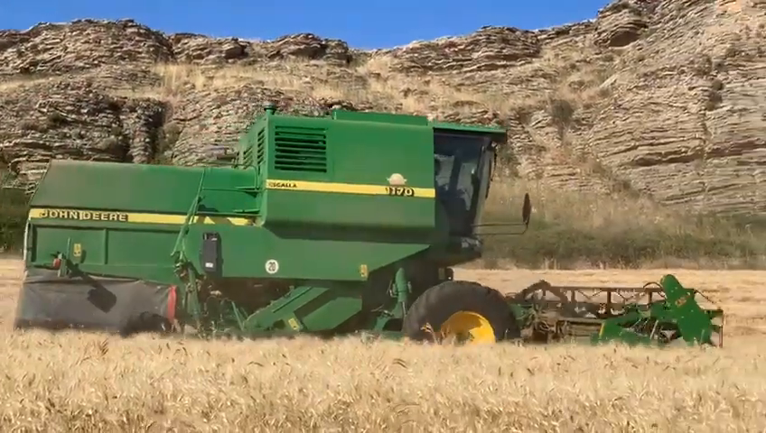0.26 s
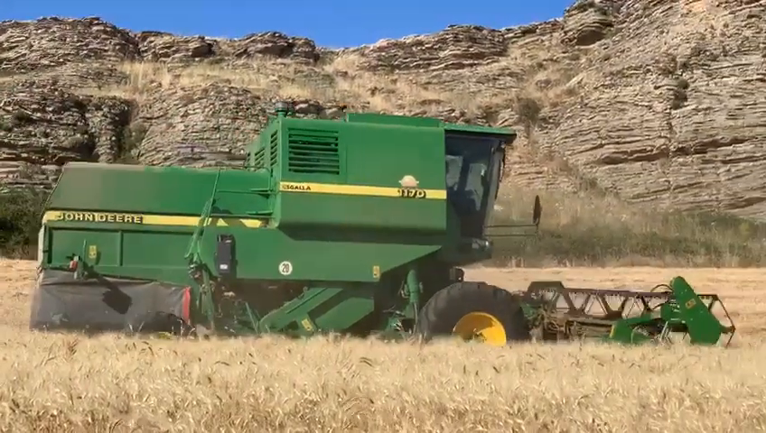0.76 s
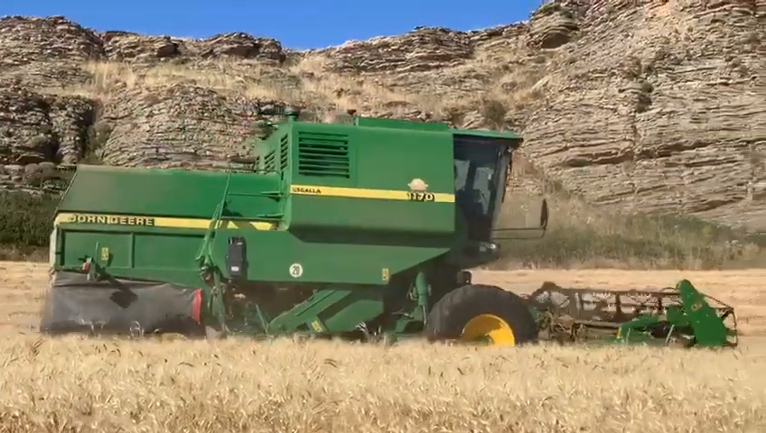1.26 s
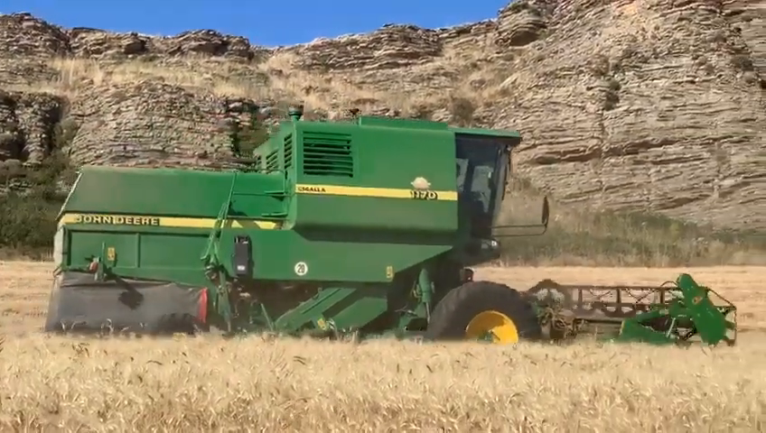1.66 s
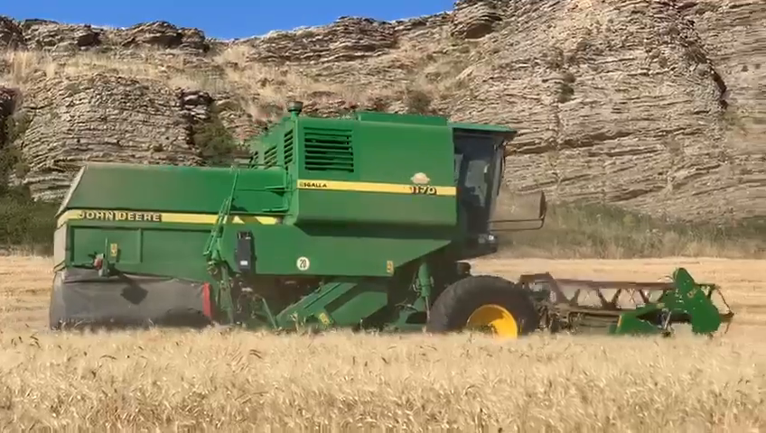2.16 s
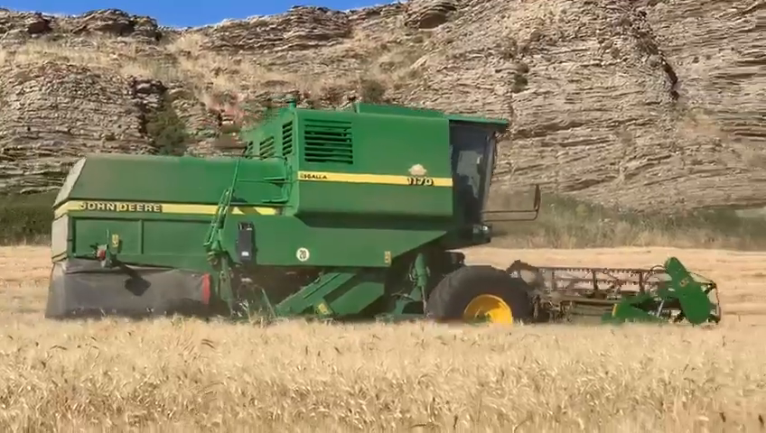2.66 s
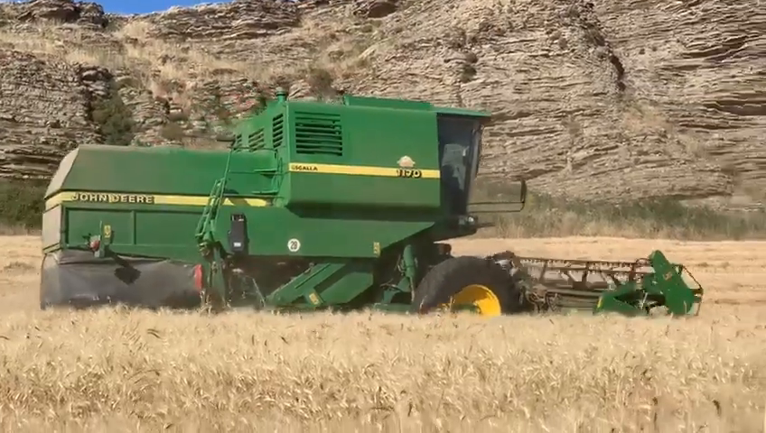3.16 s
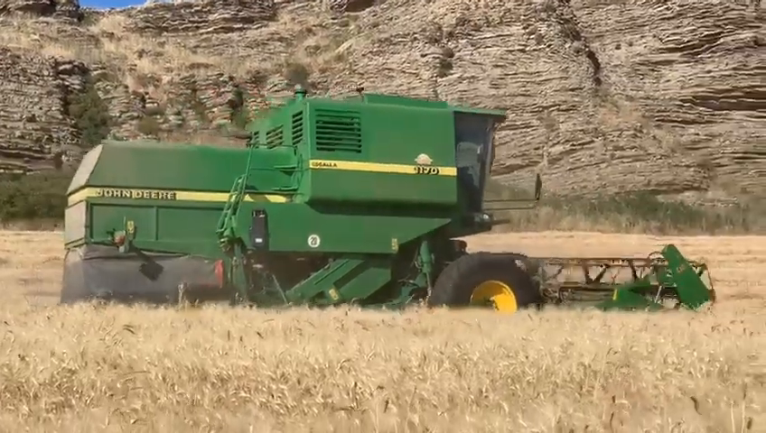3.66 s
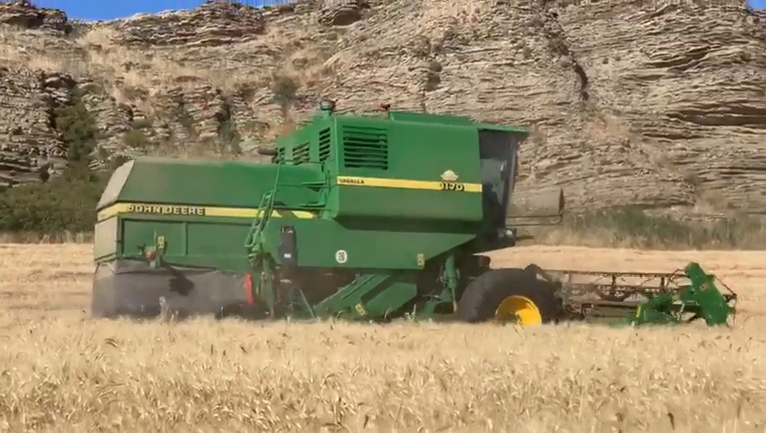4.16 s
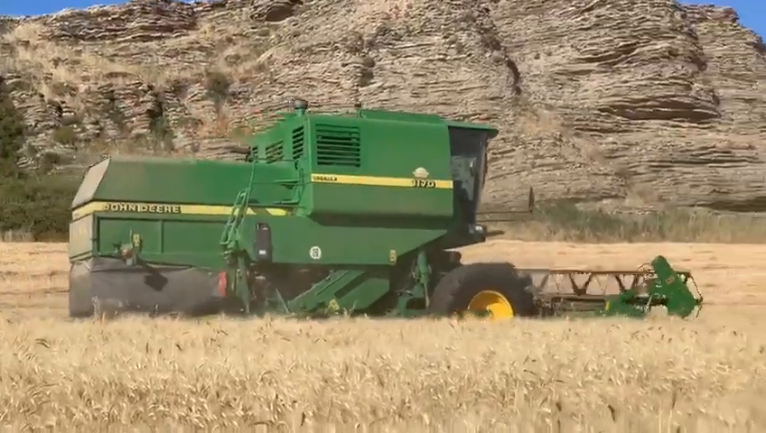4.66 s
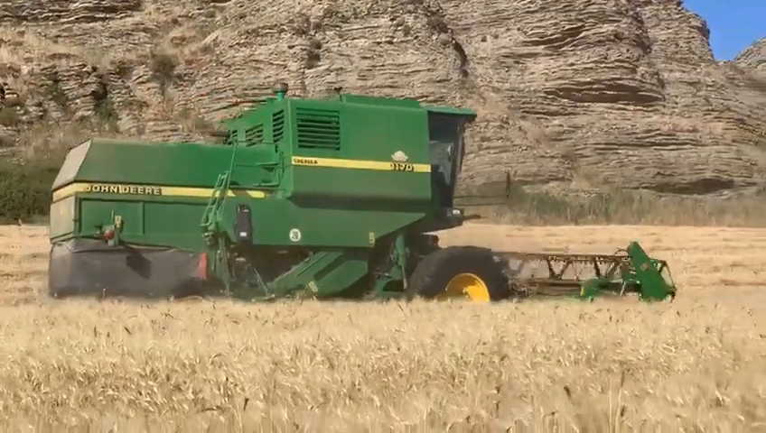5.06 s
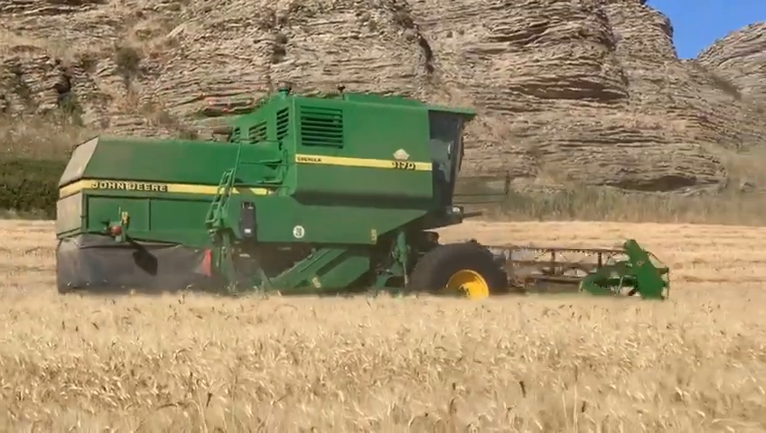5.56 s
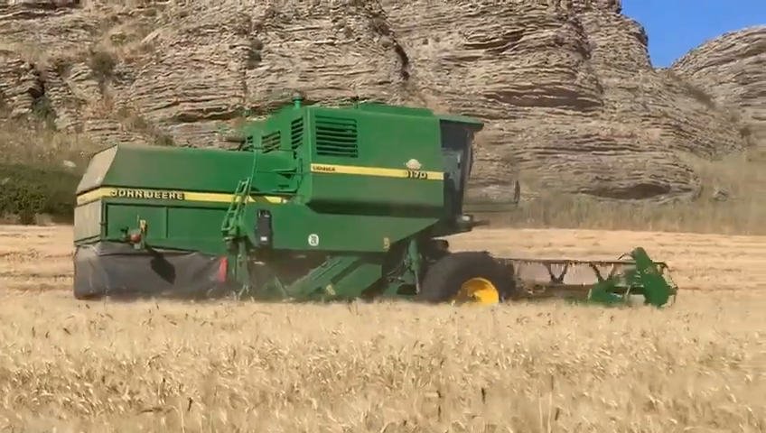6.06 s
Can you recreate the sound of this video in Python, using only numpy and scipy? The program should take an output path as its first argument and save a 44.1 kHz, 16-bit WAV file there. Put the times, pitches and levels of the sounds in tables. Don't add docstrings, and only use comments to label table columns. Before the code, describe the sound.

Low wind buffeting with sharp cracks and thuds half covers a harvester's constant engine and thresher roar, chaff hiss and sparse clacks.

```python
import sys
import numpy as np
from scipy import signal
from scipy.fft import rfft, irfft, next_fast_len
from scipy.io import wavfile
from scipy.ndimage import uniform_filter1d

SR = 44100
rng = np.random.default_rng(int(sys.argv[2]) if len(sys.argv) > 2 else 0)


def attenuation_scalar(level_db):
    decades = np.asarray(level_db, float) / 20
    return 10 ** decades


def put_to_file(sound):
    columns = np.atleast_2d(sound).T
    safe = np.clip(columns, -1, 1)
    whole_steps = np.round(safe * 32767)
    wavfile.write(sys.argv[1], SR, whole_steps.astype(np.int16))


N = 278271

# pitch_hz, lean_db
PORT_LEAN = [(400, -0.64), (650, 2.5), (950, 0.5), (1150, 5.5), (1400, 3), (1700, 5), (2200, 0),
             (2500, -5.5), (5300, -1.5), (6500, 2.74)]


def evened(x):
    return x / np.sqrt(np.mean(x ** 2) + 1e-20)


def read(points, hz):
    f, value = np.transpose(points)
    return np.interp(np.log(hz + 1), np.log(f + 1), value)


def along(rows, count):
    s, *columns = np.transpose(rows)
    times = np.linspace(0, N / SR, count)
    return [np.interp(times, s, column) for column in columns]


def wander(width_hz):
    pole = np.exp(-2 * np.pi * width_hz / SR)
    drift = signal.lfilter([1], np.poly([pole, pole]), rng.standard_normal(N + SR))
    return evened(drift[SR:])


def add(mix, s, sound):
    part = mix[..., round(s * SR):][..., :len(sound)]
    part += sound[:part.shape[-1]]


def swell(start, length, rise, fall):
    t = np.arange(N) / SR - start
    return np.clip(t / rise + 1, 0, 1) ** 2 * np.exp(-np.maximum(t - length, 0) / fall)


def burst(hz, cycles):
    u = np.arange(int(3 * cycles * SR / hz)) * hz / SR
    hump = (u / cycles) * np.exp(1 - u / cycles * 2) * 2
    return np.sin(2 * np.pi * u) * hump


def rush(shape_db, patchy_db, flicker_db):
    frames = N // 128 + 5
    z = rng.standard_normal((frames, 257, 5)).T
    patches = uniform_filter1d(z[4], size=8, axis=0)
    patches = evened(uniform_filter1d(patches, size=20, axis=1))
    flicker = evened(uniform_filter1d(rng.standard_normal(frames), size=12))
    field = attenuation_scalar(shape_db[:, None] + patchy_db * patches + flicker_db * flicker)
    noise = signal.istft((z[:2] + 1j * z[2:4]) * field, nperseg=512, noverlap=384)[1]
    return evened(noise[:, :N])


def middle_slice():
    # start_s, length_s, level_db
    slice_swells = [
        (0.61, 0.051, -48.5),
        (0.907, 0.15, -47),
        (3.285, 0.31, -45.5),
        (3.852, .6, -51),
        (4.9, 0.32, -48),
        (5.497, 0.77, -43.5),
    ]
    floor_db, edge_s = -57.5, 0.057
    band = signal.butter(2, [2500, 3800], "band", fs=SR, output="sos")
    power = attenuation_scalar(2 * floor_db)
    for s, length, db in slice_swells:
        power = power + attenuation_scalar(2 * db) * swell(s, length, edge_s, edge_s)
    return np.sqrt(power) * evened(signal.sosfilt(band, rng.standard_normal(N)))


def straw_hiss():
    # pitch_hz, density_db_per_hz
    straw = [(2000, -9.5), (4400, -10), (5800, 0), (6800, -5), (7700, -1.5), (8100, -0.5), (9000, 0),
             (10500, -5), (11700, -5.5)]
    # start_s, peak_db
    clacks = [(0.395, -31), (0.5222, -23), (0.6414, -21), (0.746, -13.5), (1.7355, -35), (2.1889, -13),
              (2.4738, -19), (2.9178, -13), (3.136, -23), (3.89, -14.5), (4.9881, -14), (5.6565, -22),
              (6.1828, -8)]
    hiss_db = np.linspace(-43.5, -46.5, N)
    hz = np.fft.rfftfreq(512, 1 / SR)
    hiss = attenuation_scalar(hiss_db + 6.5) * rush(read(straw, hz), patchy_db=1.05, flicker_db=1.12)
    decay = np.exp(-np.arange(SR // 10) / SR / 0.012)
    lift = np.ones(N)
    for s, db in clacks:
        add(lift, s, attenuation_scalar(db + 16.0) * decay)
    return hiss * lift


def engine_roar():
    # pitch_hz, density_db_per_hz
    roar = [(60, -4.5), (150, 5), (400, -17.5), (520, -41), (600, -0.5), (860, -1), (980, -13),
            (1400, -3.5), (1600, -15), (2000, -10.5), (2300, -17.5), (3200, -17.5), (4400, -21.5),
            (6000, -33.5)]
    # time_s, level_db
    work = [
        (0.0, -32),
        (2.81, -31.5),
        (3.48, -33),
        (5.48, -32),
        (5.76, -35),
        (6.31, -34),
    ]
    roar_db, = along(work, count=N)
    hz = np.fft.rfftfreq(512, 1 / SR)
    echo_db = 20 * np.log10(abs(1 + 0.1 * np.exp(-2j * np.pi * hz / 590)))
    return attenuation_scalar(roar_db + 7) * rush(read(roar, hz) + echo_db, patchy_db=1.5, flicker_db=-0.24)


def rotating_parts():
    # pitch_hz, width_hz, start_db, end_db
    tones = [
        (74.7, 4.51, -43.5, -40),
        (570, 4.73, -32.5, -47),
        (732.5, 12.14, -35.5, -38),
        (825, 7.89, -36, -54.5),
        (1293, 19, -37.5, -64),
    ]
    # start_s, peak_db, pitch_hz
    ticks = [
        (1.121, -18, 2360),
    ]
    out = np.zeros(N)
    for f, width, start_db, end_db in tones:
        turns = np.cumsum(f + width * wander(width_hz=3.124)) / SR
        level_db = np.linspace(start_db, end_db, N) + 3.0 * wander(width_hz=10.0)
        out += attenuation_scalar(level_db) * np.sin(2 * np.pi * turns)
    for s, db, tick_hz in ticks:
        add(out, s, attenuation_scalar(db) * burst(tick_hz, 2.5))
    return out


def ports(shared, apart):
    # pitch_hz, likeness
    same = [(200, 0.48), (480, 0.74), (900, 0.99), (1100, 0.77), (1400, 1), (1650, 0.082), (1830, 0.9),
            (2080, 0.053), (2280, 0.7), (2600, .8), (2950, 1), (3700, 0.8), (5200, 0.54), (6600, 0.83),
            (7100, 0.96)]
    # pitch_hz, turn_rad
    turn = [(100, 0.0), (250, -3.1), (480, -6.3), (1500, -7.4), (1800, -6.3), (2020, -7.1), (2150, -5.7),
            (2760, -8.0), (2930, -9.42), (7400, -9.42), (8650, -6.75), (9300, -6.28), (10050, -6.05),
            (10950, -3.14)]
    # pitch_hz, turn_rad
    rock = [(3250, 0.0), (3550, .8), (3780, 0.0), (4130, 1.9), (4480, .3), (4750, 2.3), (5050, .5),
            (5450, 2.2), (5850, .2), (6200, 1.8), (6700, 0.0)]
    size = next_fast_len(N + 4096)
    hz = np.fft.rfftfreq(size, 1 / SR)
    left, own = rfft(shared, size), rfft(apart, size)
    like = np.clip(read(same, hz), 0, 1)
    angle = read(turn, hz) - read(rock, hz)
    right = (like * left + np.sqrt(1 - like ** 2) * own) * np.exp(1j * angle)
    lean = attenuation_scalar(read(PORT_LEAN, hz) / 2)
    return irfft(np.array([left * lean, right / lean]), size)[:, :N]


def harvester():
    machine = engine_roar() + straw_hiss()
    machine[0] += rotating_parts()
    return ports(*machine)


def eddy_trains():
    # time_s, strength_db
    breeze = [(0.0, -16.5), (0.22, -23.5), (0.5, -26.5), (0.7, -22), (1.05, -22), (1.7, -26), (2.3, -27),
              (2.75, -25.5), (3.18, -26), (3.43, -26), (3.78, -17.5), (4.0, -25.5), (4.25, -27.5),
              (4.55, -19.5), (5.54, -24.5), (5.9, -28.5), (6.03, -23.5), (6.31, -33)]
    # start_s, length_s, strength_db, pitch_hz of the main eddies
    gust_list = [(0.016, 0.064, -23, 160), (0.352, 0.073, -20.5, 300), (0.574, 0.038, -18.5, 230),
                 (0.624, 0.13, -21.5, 170), (0.925, .04, -36, 250), (1.228, 0.056, -22, 151),
                 (0.78, 0.11, -25, 152), (2.588, 0.056, -28, 80), (2.845, 0.052, -13.5, 254),
                 (2.933, 0.13, -13, 278), (3.262, 0.081, -15.5, 326), (3.529, 0.045, -17.5, 261),
                 (3.625, 0.055, -15, 257), (3.708, .085, -15, 230), (3.843, 0.072, -17.5, 170),
                 (4.33, 0.055, -23, 83), (4.465, 0.081, -15.5, 128), (4.652, 0.08, -16, 247),
                 (4.863, 0.083, -14, 395), (4.97, 0.063, -15.5, 201), (5.154, .05, -30, 130),
                 (5.214, 0.2, -24, 125), (5.36, 0.039, -29, 90), (5.495, 0.033, -27, 191),
                 (5.578, .085, -17.5, 105), (5.709, 0.074, -17.5, 198), (6.014, 0.071, -23, 300),
                 (6.149, 0.038, -20, 70), (6.235, 0.035, -16.5, 58), (6.271, .05, -14.5, 330)]
    # low_hz, top_hz, cycles, spread_db, breeze_share_db, gust_share_db
    eddies = [
        (47.62, 85, 1.8, 1.3, 0, 5),
        (100, 190, 1.53, 1.16, -1, -1.2),
        (208.3, 430, 1.6, 2, -3, -1.62),
        (426.4, 900, 1.9, 1, -17.5, -8),
    ]
    rise_s, fall_s, db_per_octave = 0.0063, 0.0084, 4
    breeze_db, = along(breeze, count=N)
    gusts = np.array([swell(s, length, rise_s, fall_s) for s, length, db, hz in gust_list])
    gust_db, gust_hz = np.transpose(gust_list)[2:]
    clumps = attenuation_scalar(2.86 * wander(width_hz=38.3))
    out = np.zeros((2, N))
    for low_hz, top_hz, cycles, spread_db, breeze_share_db, gust_share_db in eddies:
        octaves = np.log2(np.sqrt(low_hz * top_hz) / gust_hz)
        gust_power = attenuation_scalar(2 * (gust_db + gust_share_db - db_per_octave * octaves ** 2)) @ gusts
        breeze_power = attenuation_scalar(2 * (breeze_db + breeze_share_db))
        layer = np.zeros((2, N))
        for hz in np.geomspace(low_hz, top_hz, num=5):
            port, place, size, sign = rng.random((4, round(hz * 5)))
            port, place = np.round(port).astype(int), (place * N).astype(int)
            train = np.zeros((2, N))
            train[port, place] = attenuation_scalar(-spread_db * np.log(size + 0.0027)) * np.sign(sign - .5)
            layer += signal.oaconvolve(train, burst(hz, cycles)[None], axes=1)[:, :N]
        out += np.sqrt(gust_power + breeze_power) * evened(layer * clumps)
    return out


def add_single_eddies(out):
    # start_s, peak_db, pitch_hz, cycles
    heaves = [
        (4.368, -8.5, 90, 1),
        (5.031, -11, 92, 1.7),
        (5.146, -7, 115, 0.85),
        (5.428, -9.5, 100, 1.0),
        (5.669, -3, 90, 0.78),
        (6.158, -3.5, 74, 1.1),
        (6.232, -12, 64.6, 1.2),
        (6.258, -7, 72, 1.1),
    ]
    # start_s, peak_db, pitch_hz, cycles
    pops = [(0.386, -10, 571, 2.6), (0.57, 2, 212, 1.9), (0.7, -12, 424, 1.4), (0.799, -11.5, 218, 3.7),
            (0.934, -9.5, 222, 2.6), (3.318, -15.5, 369, 5.3), (1.387, -12.5, 167, 2.5),
            (2.145, -16.5, 455, 3), (2.85, -13, 151, 0.83), (2.954, -8, 498, 3.2), (2.994, -5, 500, 1.6),
            (3.007, -10.5, 330, 3.7), (3.029, -10, 292, 1.1), (3.068, -25, 683, 1.2), (3.261, -10, 330, 1),
            (3.277, -10.5, 584, 3.5), (3.289, -11, 363, 2.2), (3.544, -5, 110, 0.83),
            (3.647, -11, 166, 2.5), (3.719, -9, 522, 4.8), (3.768, -5, 503, 1.8), (3.784, -5, 463, 1.1),
            (4.728, -8.5, 246, 1.7), (4.314, -9.5, 178, 1.5), (4.517, 0.5, 294, 1.7), (4.669, -8, 275, 1.4),
            (4.888, -6, 220, 3.8), (5.271, -8.5, 204, 2.5), (5.735, -15, 289, 1.6), (6.017, -9.5, 322, 1.5)]
    for s, db, hz, cycles in [*heaves, *pops]:
        add(out, s, attenuation_scalar(db - 2.5) * burst(hz, max(cycles, .3)))


def add_snaps(out):
    # start_s, peak_db
    snaps = [(0.387, -15), (2.954, -16), (3.044, -6.5), (3.068, -10.5), (3.281, -0.8), (3.304, -17),
             (3.647, -12), (3.716, -7), (3.781, -5.5), (4.897, -7.5), (4.916, -17), (6.044, -10)]
    snap_hz = 685
    for s, db in snaps:
        add(out, s, attenuation_scalar(db - 3.5) * burst(snap_hz, 1))
        add(out, s, attenuation_scalar(db - 7.0) * burst(1.43 * snap_hz, 1.0))


def gust_ports(shared, apart):
    # pitch_hz, likeness
    gust_same = [(60, 0.44), (130, 0.66), (250, 0.59), (450, 0.8), (700, 0.28), (1500, 0.38)]
    # pitch_hz, turn_rad
    gust_turn = [(100, 0.0), (250, -3.1), (480, -6.3), (650, -5.3), (1100, -5.3), (1500, -7.0)]
    # start_s, length_s
    veers = [
        (.8, 0.15),
        (1.202, 0.12),
        (1.8, 0.17),
        (2.965, 0.49),
        (4.638, 0.17),
        (5.42, .9),
    ]
    straight, veered, edge_s = .92, 1.477, 0.026
    hz, t, (left, own) = signal.stft([shared, apart], SR, nperseg=2048, noverlap=1536)
    veer = np.minimum(sum(swell(s, length, edge_s, edge_s) for s, length in veers), 1)
    path = straight + (veered - straight) * np.interp(t, np.arange(N) / SR, veer)
    like = np.clip(read(gust_same, hz), 0, 1)[:, None]
    lean = attenuation_scalar(read(PORT_LEAN, hz) / 2)[:, None]
    angle = read(gust_turn, hz[:, None] * path)
    right = (like * left + np.sqrt(1 - like ** 2) * own) * np.exp(1j * angle)
    return signal.istft([left * lean, right / lean], SR, nperseg=2048, noverlap=1536)[1][:, :N]


def wind():
    out = eddy_trains()
    add_single_eddies(out)
    add_snaps(out)
    return gust_ports(*out)


def scene():
    return middle_slice() + harvester() + wind()


def top_cut(x):
    return signal.sosfilt(signal.butter(12, 11800, fs=SR, output="sos"), x)


def record(dry):
    cut = signal.sosfilt(signal.butter(3, 46, "high", fs=SR, output="sos"), dry)
    ceiling = .92
    limited = ceiling * cut / (ceiling ** 4 + cut ** 4) ** .25
    return top_cut(limited)


dry = scene()
out = record(dry)
put_to_file(out)
```